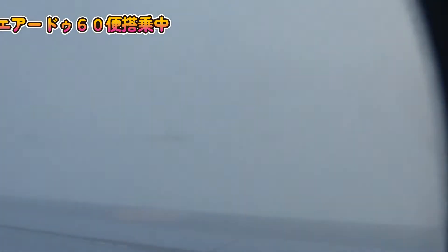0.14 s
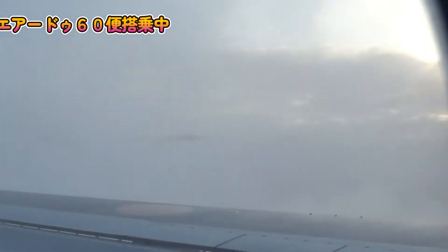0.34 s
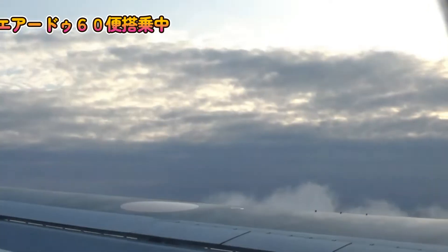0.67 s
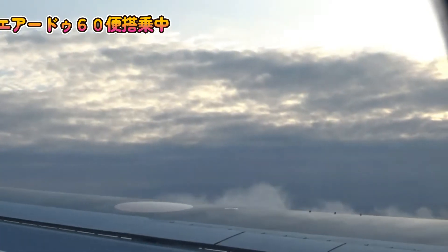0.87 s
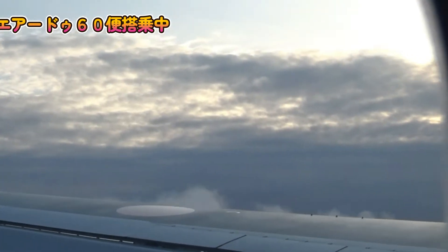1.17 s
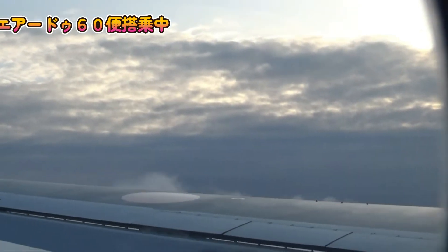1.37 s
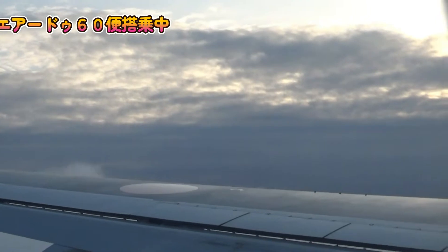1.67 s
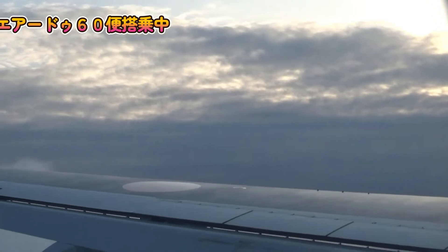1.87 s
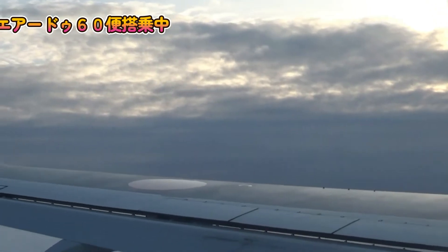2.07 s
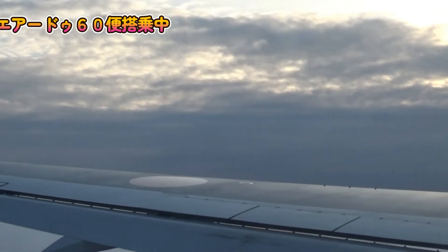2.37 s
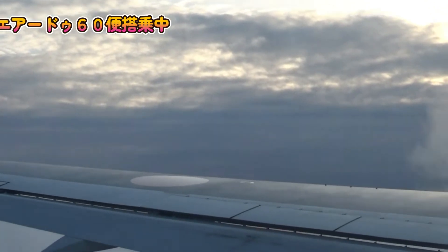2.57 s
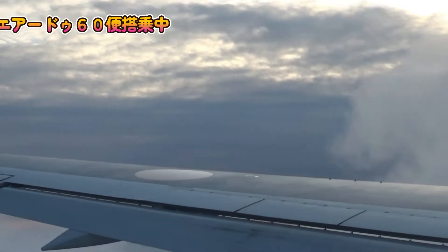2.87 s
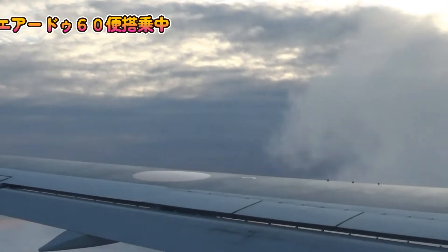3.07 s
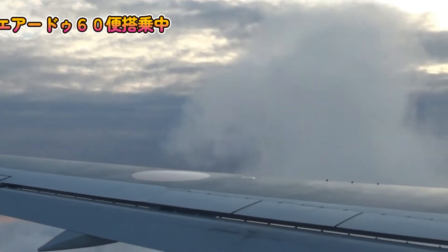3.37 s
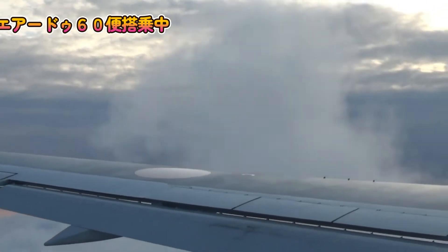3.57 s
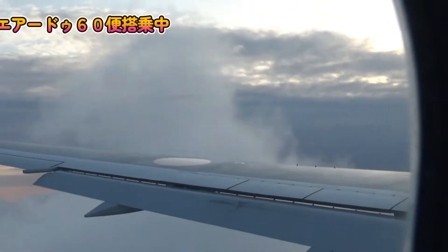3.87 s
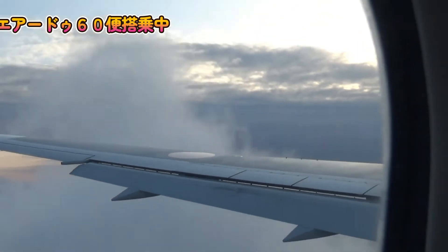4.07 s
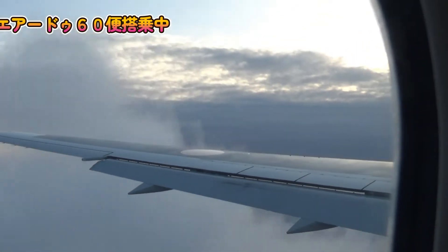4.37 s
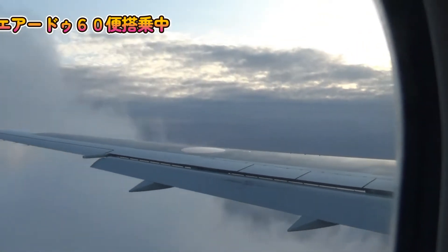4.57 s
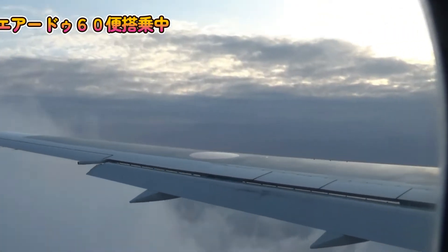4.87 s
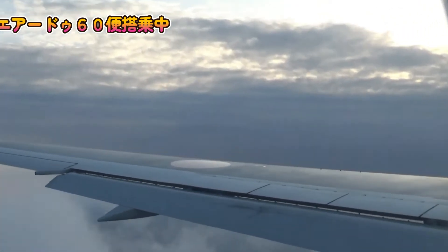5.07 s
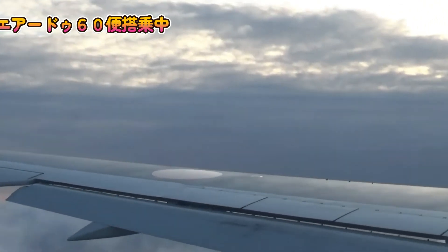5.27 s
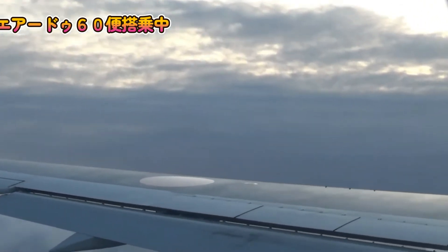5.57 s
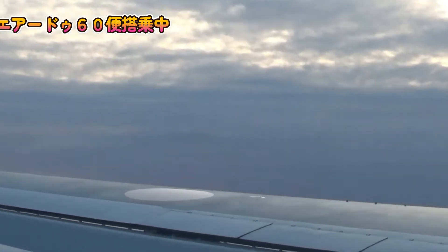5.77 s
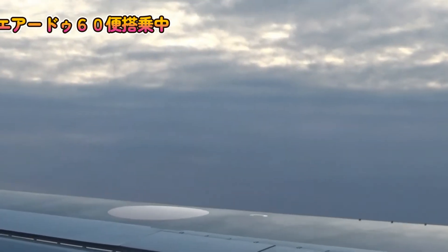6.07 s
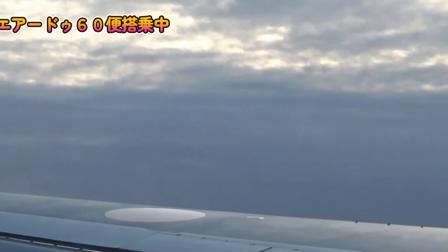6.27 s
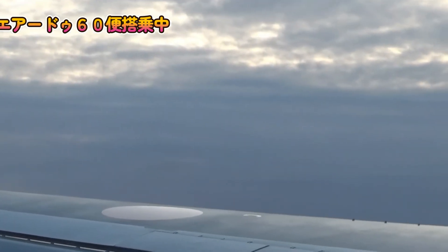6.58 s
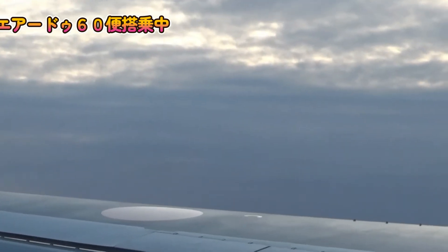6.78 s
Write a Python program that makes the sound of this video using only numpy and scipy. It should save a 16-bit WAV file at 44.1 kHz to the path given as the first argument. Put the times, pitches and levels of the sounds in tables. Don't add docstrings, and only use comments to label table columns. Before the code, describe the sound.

Continuous airliner cabin noise: deep, dense bass rumble through the fuselage dominates, with turbulent airflow above it and thin airy hiss on top. Buffeting moves the loudness only a decibel or so. A small trim tick comes early, another with a tiny squeak near the middle, then faint squeaks and a cloth rub around five seconds. Enclosed cabin, small hand-held stereo microphone, slightly watery treble, no real silence.

```python
import sys
import numpy as np
from scipy import signal
from scipy.fft import rfft, irfft, next_fast_len
from scipy.io import wavfile

SR = 44100
rng = np.random.default_rng(int(sys.argv[2]) if len(sys.argv) > 2 else 0)


def digitize_waveform(pressure):
    field = np.atleast_2d(pressure).T
    bounded = np.clip(field, -1, 1)
    quanta = np.round(bounded * 32767).astype(np.int16)
    wavfile.write(sys.argv[1], SR, quanta)


def ratio(d):
    e = np.asarray(d, float) / 20
    return 10 ** e


N = 306054


def at_hz(points, hz):
    points = np.array(points)
    return np.interp(np.log(hz + 1), np.log(points[:, 0]), points[:, 1])


def drift(rate_hz):
    r = np.exp(-80 * np.pi * rate_hz / SR)
    slow = signal.lfilter([1], [1, -2 * r, r * r], rng.standard_normal(N // 40 + 2002))[2000:]
    return np.interp(np.arange(N) / 40, np.arange(len(slow)), slow / np.std(slow))


def band(x, low_hz, high_hz):
    edges_hz = np.clip([low_hz, high_hz], 20, SR * .45)
    return signal.sosfilt(signal.butter(2, edges_hz, "band", fs=SR, output="sos"), x)


def tone(hz, level_db):
    return np.sqrt(2) * ratio(level_db) * np.sin(2 * np.pi * np.cumsum(hz) / SR)


def add_at(out, t_s, sound):
    out[round(t_s * SR):][:len(sound)] += sound


# [f/Hz, width/Hz, lift/dB]
MODES = [(63.6, 9, -6.5), (71, 6.5, 6), (90.8, 5.6, 5), (113.6, 12.6, 4), (130, 7.8, -2.5),
         (222.7, 15, -2.5), (238, 43, 0.5), (302, 25, -2), (338.4, 50, 2), (485, 28, 0), (678, 55, 3.5),
         (983, 39, 5), (1070, 30, 1), (1400, 60, 1), (1513, 49, -3.5), (2000, 80, 0.5), (2130, 60, -1.5),
         (2486, 200, 4.5), (3220, 60, 4), (3460, 140, 2.5), (3890, 90, -6), (4540, 150, -2),
         (4700, 200, 1.5), (5400, 120, 1.5), (8050, 250, -2.5), (8430, 350, 2), (9450, 300, 2),
         (10470, 400, 4), (11050, 400, 1), (11600, 600, 3)]
# [f/Hz, level/dB]
LEAN = [(130, 2), (260, 1), (430, -1.5), (670, -2), (800, -1.2), (990, -2.6), (1250, -0.5), (2000, 0.5)]
# [f/Hz, level/dB]
UNLIKE = [(25, -18.5), (370, -27.5), (800, -21.5), (1500, -28.5), (4600, -24), (6000, -14), (11100, -5),
          (11700, -12)]


def rush(spectrum, level_db, flicker_db, flicker_hz):
    shell_hz, shell_width_hz, shell_db = 2450, 500, 8
    size = next_fast_len(N)
    hz = np.arange(size // 2 + 1) * SR / size
    lift_db = sum(db / (1 + (2 * (hz - f) / width) ** 2) for f, width, db in MODES)
    shared, own = rfft(rng.standard_normal((2, size))) * ratio(at_hz(spectrum, hz) + lift_db)
    ring_db = shell_db / (1 + (2 * (hz - shell_hz) / shell_width_hz) ** 2)
    own = own * ratio(at_hz(UNLIKE, hz) + ring_db)
    lean = ratio(at_hz(LEAN, hz) / 2)
    ports = irfft([shared * lean + own, shared / lean - own], size)[:, :N]
    return ports / np.std(ports.mean(axis=0)) * ratio(level_db + flicker_db * drift(flicker_hz))


# [t/s, level/dB]
BUFFET = [(0, -.5), (.35, -1.4), (.8, 0.9), (2.6, -0.4), (3.0, -0.5), (3.3, .2), (4.5, 0.57), (5.8, -0.6),
          (6.35, -0.1), (6.94, -0.4)]


def buffeting():
    t_s, level_db = np.transpose(BUFFET)
    return np.interp(np.arange(N) / SR, t_s, level_db)


# [f/Hz, density/dB per Hz]
RUMBLE = [(14, -59), (24, -36), (36, -29), (58, -21), (80, -13), (101, -4), (150, 1), (244, -1.5),
          (291, -6.5), (347, -4), (378, -6.5), (445, -17.5), (620, -48.5), (1060, -120)]


def jet_rumble(buffet_db):
    return rush(RUMBLE, -35 + buffet_db, flicker_db=0.22, flicker_hz=3.5)


# [f/Hz, density/dB per Hz]
ROAR = [(260, -36), (440, -6), (507, -1.5), (679, -1), (789, -7), (984, -12.5), (1170, -16.5),
        (1380, -16.5), (1840, -22.5), (2030, -20.5), (2900, -34.5), (3770, -66), (6380, -120)]


def panel_roar(buffet_db):
    return rush(ROAR, -51 + .3 * buffet_db, flicker_db=0.27, flicker_hz=2.1)


# [f/Hz, density/dB per Hz]
HISS = [(1590, -30), (2700, -6.5), (2970, -5), (3560, -0.5), (3920, -0.5), (4770, -3.5), (5730, -8.5),
        (8560, -12), (10900, -19), (11800, -16), (15500, -23)]


def vent_hiss(buffet_db):
    return rush(HISS, -72 + .05 * buffet_db, flicker_db=0.33, flicker_hz=12.0)


# [t/s, peak level/dB, centre f/Hz, t60/s]
TICKS = [
    (0.994, -56, 4200, .03),
    (0.995, -64, 7500, .022),
    (1.37, -72, 7500, .015),
    (2.955, -61, 7100, .045),
    (2.956, -66, 9500, .045),
    (2.958, -79, 13000, .03),
    (4.581, -68, 14300, .022),
    (6.6, -78, 11000, .015),
]


def trim_ticks():
    out, width_hz = np.zeros(N), 1900
    t = np.arange(4000) / SR
    for t_s, peak_db, hz, t60_s in TICKS:
        puff = rng.standard_normal(len(t)) * ratio(-60 * t / t60_s)
        puff = band(puff, hz - width_hz / 2, hz + width_hz / 2)
        add_at(out, t_s, ratio(peak_db) * puff / np.abs(puff).max())
    return out


# [t/s, length/s, start f/Hz, end f/Hz, level/dB]
SQUEAKS = [
    (3.062, .028, 8040, 8140, -75),
    (3.088, .028, 8180, 8280, -80),
    (4.966, .045, 6350, 7600, -77),
    (4.986, .016, 8600, 8800, -77),
    (5.0, .016, 6300, 6200, -77),
    (3.06, .032, 4020, 4060, -71),
]


def squeaks():
    out, slip_blur = np.zeros(N), .06
    for t_s, length_s, start_hz, end_hz, level_db in SQUEAKS:
        pitch_hz = np.linspace(start_hz, end_hz, round(length_s * SR))
        pitch_hz = pitch_hz * (1 + slip_blur * rng.standard_normal(len(pitch_hz)))
        add_at(out, t_s, np.hanning(len(pitch_hz)) * tone(pitch_hz, level_db))
    return out


# [t/s, length/s, level/dB, low f/Hz, high f/Hz]
RUSTLE = [
    (4.962, .06, -76, 5900, 7500),
]


def cloth_rustle():
    out = np.zeros(N)
    for t_s, length_s, level_db, low_hz, high_hz in RUSTLE:
        hiss = band(rng.standard_normal(4000), low_hz, high_hz)[:round(length_s * SR)]
        add_at(out, t_s, ratio(level_db) * np.hanning(len(hiss)) * hiss / np.std(hiss))
    return out


# [f/Hz, rms level/dB, wander/Hz]
TONES = [
    (1607, -81, .4),
    (3455, -91, 3.5),
    (11729, -113, 3.0),
    (12870, -115, 2.5),
]


def machine_tones():
    return sum(tone(hz + wander_hz * drift(0.398), level_db + 2.1 * drift(0.67))
               for hz, level_db, wander_hz in TONES)


# [f/Hz, rms level/dB, from t/s, to t/s, wander/Hz]
WHINE = [
    (14466, -106, 0, 3.2, 4.0),
    (13657, -103, 4.4, 7.0, 1.0),
]


def camera_whine():
    t = np.arange(N) / SR
    out = np.zeros(N)
    for hz, level_db, start_s, end_s, wander_hz in WHINE:
        fade = np.clip(np.minimum(t - start_s + .15, end_s - t) / .3, 0, 1)
        out += fade * tone(hz + wander_hz * drift(.5), level_db)
    return out


def scene():
    buffet_db = buffeting()
    air = jet_rumble(buffet_db) + panel_roar(buffet_db) + vent_hiss(buffet_db)
    small = trim_ticks() + squeaks() + cloth_rustle()
    return air + small + machine_tones() + camera_whine()


# [f/Hz, spread of shared sound/dB, spread of port difference/dB]
STARVED = [(100, -0.3, 6), (900, 0.33, 2), (1300, 0.74, 4.5), (6500, 0.6, 3), (8300, 2.6, 1.5),
           (11000, 3.5, 0), (11700, 1.6, 5), (15000, 0.3, 5.5)]


def starve(ports):
    band_hz, bass_share, hold = 380, .25, .2
    pair = np.array([[1, 0.97], [1, -1.02]])
    hz, _, frames = signal.stft(pair @ ports / 2, SR, nperseg=2048)
    which = np.cumsum(hz[1] / np.clip(bass_share * hz, 4 * hz[1], band_hz)).astype(int)
    luck = rng.standard_normal((2, 200, frames.shape[2]))
    luck[1] = .92 * luck[1] + .4 * luck[1, :1]
    luck = signal.lfilter([np.sqrt(1 - hold ** 2)], [1, -hold], luck)
    luck = 1.6 * np.tanh(luck[:, which] / 1.2)
    table = np.array(STARVED)
    spread_db = np.array([at_hz(table[:, [0, k]], hz) for k in (1, 2)])[:, :, None]
    gain = ratio(spread_db * luck - spread_db ** 2 * np.log(10) / 20)
    return pair @ signal.istft(frames * gain, SR, nperseg=2048)[1][:, :N]


def low_pass(x):
    return signal.sosfilt(signal.butter(12, 15730, fs=SR, output="sos"), x)


def record(dry):
    mix = starve(dry)
    return low_pass(mix)


dry = scene()
out = record(dry)
digitize_waveform(out)
```